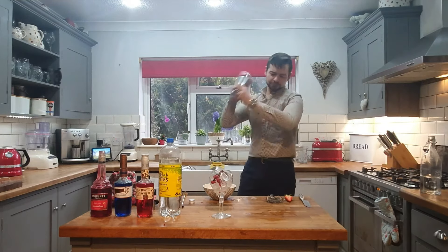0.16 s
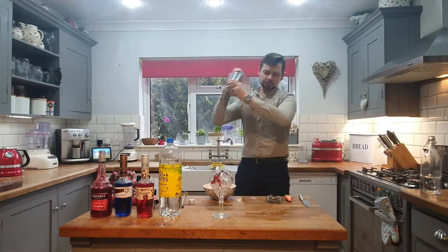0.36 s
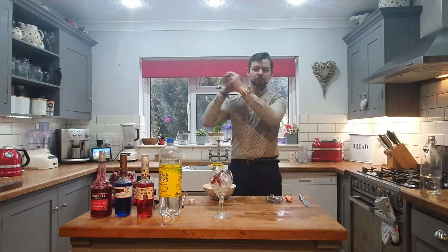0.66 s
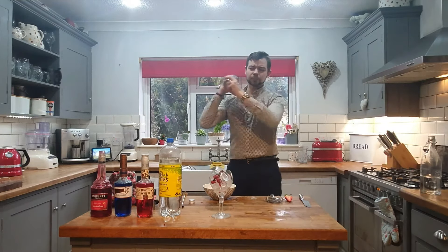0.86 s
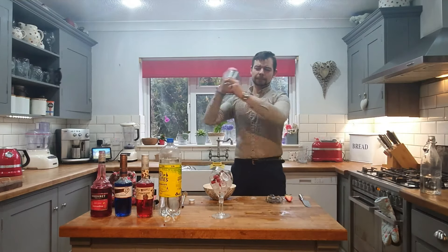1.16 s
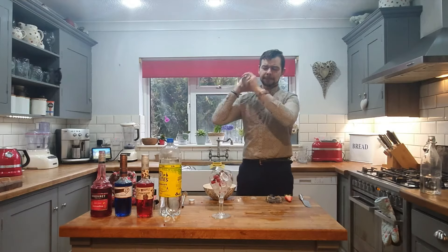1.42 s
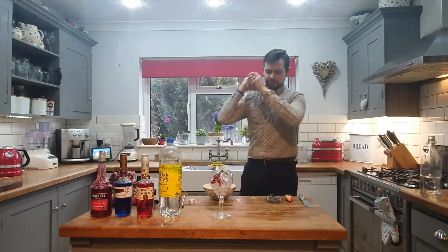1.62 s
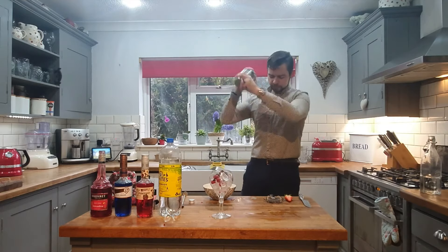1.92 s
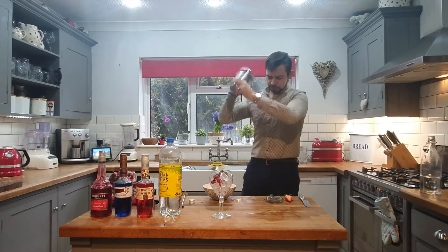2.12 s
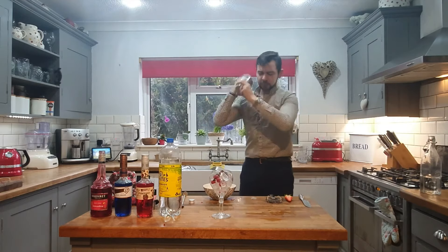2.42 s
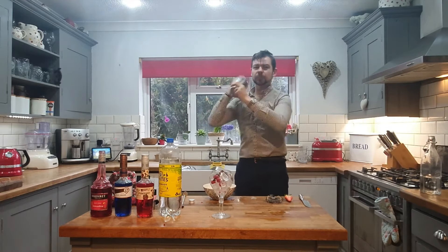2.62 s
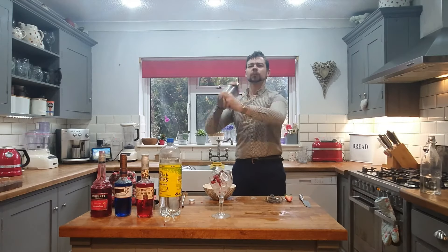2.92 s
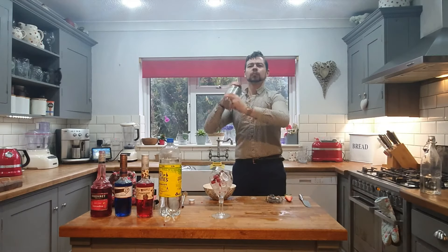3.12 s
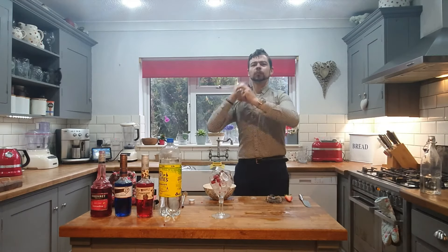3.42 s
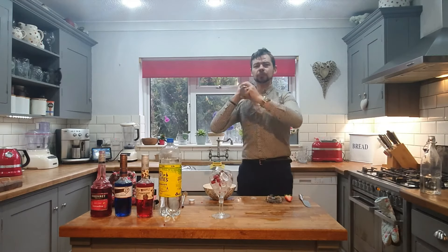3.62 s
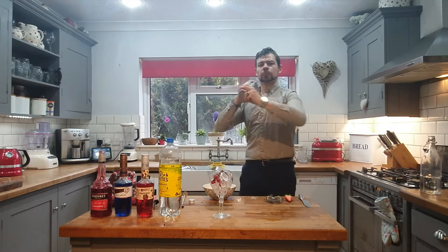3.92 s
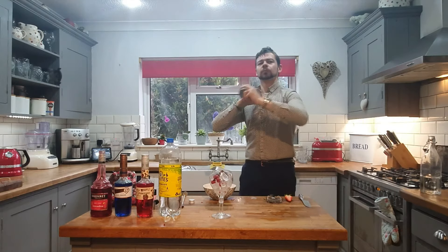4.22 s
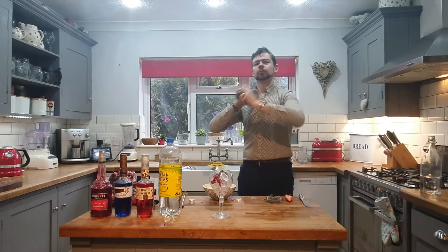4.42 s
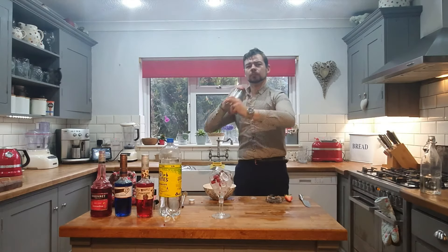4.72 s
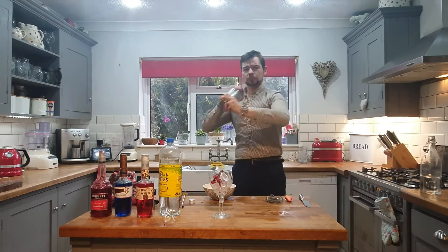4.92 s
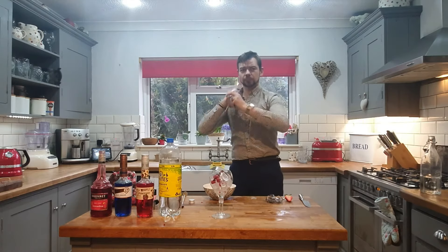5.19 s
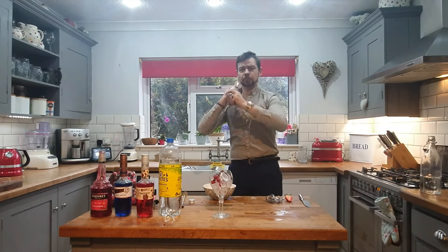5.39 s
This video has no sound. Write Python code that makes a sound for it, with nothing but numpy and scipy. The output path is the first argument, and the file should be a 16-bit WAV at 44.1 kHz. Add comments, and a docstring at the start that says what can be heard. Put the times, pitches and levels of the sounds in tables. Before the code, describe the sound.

A metal cocktail shaker full of ice is shaken hard at about five strokes a second, already in motion at the start and never stopping. Each stroke gives a dense rattling surge, then a lighter return, with dull metallic knocks and bright ticks. The shaker is a few metres from a stereo microphone pair in a hard, tiled kitchen, so reverberation blurs the hits over a very faint low rumble.

```python
"""Ice cubes are shaken hard in a steel cocktail shaker, a few metres from two microphones in a tiled kitchen.
At each end of a stroke the load surges against the wall: random clicks excite resonances of shell and ice.
Big cubes knock the hand-damped shell: short decaying sines, thuds and ticks, with a few bright cracks.
Most of what arrives is the kitchen's reverberation, made of decaying noise, over a faint rumble and hum."""
import sys
import numpy as np
from scipy import signal
from scipy.fft import rfft, irfft, next_fast_len
from scipy.io import wavfile
from scipy.ndimage import uniform_filter1d

SR = 44100
rng = np.random.default_rng(int(sys.argv[2]) if len(sys.argv) > 2 else 0)


def convert_level_to_amplitude(level_db):
    """Map a level in decibels to its linear amplitude factor."""
    exponent = np.asarray(level_db, float) / 20
    return 10 ** exponent


def to_wav(s):
    """Save 16-bit WAV."""
    ch = np.atleast_2d(s).T  # columns
    pcm = np.round(np.clip(ch, -1, 1) * 32767)  # PCM
    wavfile.write(sys.argv[1], SR, pcm.astype(np.int16))


N = 244755


def unit(x):
    """Scaled to rms 1."""
    return x / np.sqrt(np.mean(x ** 2) + 1e-20)


def along(points, hz):
    """Interpolates (Hz, value) points on a log-frequency axis."""
    f, v = np.transpose(points)
    return np.interp(np.log(hz + 1), np.log(f + 1), v)


def curve(rows):
    """Interpolates (seconds, value) rows to one value per sample."""
    return np.interp(np.arange(N) / SR, *np.transpose(rows))


def filtered(x, response):
    """x times a complex response of frequency."""
    m = next_fast_len(N + 8192)
    spectrum = rfft(x, m) * response(np.fft.rfftfreq(m, 1 / SR))
    return irfft(spectrum, m)[..., :N]


def resonant(x, modes):
    """x through parallel two-pole resonances of alternating sign; modes: (Hz, width Hz, dB)."""
    def response(f):
        total = 0
        for k, (centre_hz, width_hz, db) in enumerate(modes):
            damping = 1j * f * width_hz
            total = total + (-1) ** k * convert_level_to_amplitude(db) * damping / (centre_hz ** 2 - f ** 2 + damping)
        return total
    return filtered(x, response)


def contacts(per_second, spread_db):
    """Small contacts: clicks at random times, of scattered strength and random sign."""
    size = convert_level_to_amplitude(spread_db * np.clip(rng.standard_normal(N), -2, 2))
    return (rng.random(N) < per_second / SR) * size * rng.choice([-1, 1], N)


def damped(db, hz, t60_s, t):
    """A mode that starts within a few cycles and dies away."""
    onset = 1 - np.exp(-t / 0.00084)
    return convert_level_to_amplitude(db - 60 * t / t60_s) * onset * np.sin(2 * np.pi * hz * t)


# Left-right likeness of diffuse sound. Each row: frequency in Hz, correlation 0-1.
LIKENESS = [(100, 0.4), (400, 0.54), (700, 0.32), (1300, 0.05), (2300, 0)]


def paired(two):
    """Two unrelated signals mixed to the room's left-right likeness: correlation = cos(2 turn)."""
    def response(hz):
        turn = np.arccos(np.clip(along(LIKENESS, hz), 0, 1)) / 2
        return np.array([np.cos(turn), np.sin(turn)])
    mid, side = filtered(two, response)
    return np.array([mid + side, mid - side])


# Rumble course. Each row: time in seconds, level in dB.
RUMBLE_LEVEL = [(0, -51.5), (.6, -60.5), (.95, -52.5), (1.6, -56.5), (2.2, -52), (3.7, -56), (4.5, -57),
                (5.55, -54)]
# Hum course. Each row: time in seconds, level in dB.
HUM_LEVEL = [(0, -101), (1.8, -61), (2.1, -60), (3.1, -55.5), (3.5, -77), (5.55, -75)]
# Rumble spectrum. Each row: frequency in Hz, relative density in dB per Hz.
RUMBLE_SPECTRUM = [(15, -40), (30, -19), (65, -5), (140, -10), (250, -7.5), (400, -22.5), (800, -90)]


def background():
    """Low rumble noise, unevenly thinned as by a noise suppressor, and a sine hum."""
    z = signal.stft(rng.standard_normal((2, N)), nperseg=2048)[2]
    field = uniform_filter1d(rng.standard_normal(z.shape[1:]), 4, 0)
    field = uniform_filter1d(field, 3, 1)
    uneven_db = 5.1 * unit(field)
    noise = signal.istft(z * convert_level_to_amplitude(uneven_db), nperseg=2048)[1][:, :N]
    rumble = unit(filtered(paired(noise), lambda hz: convert_level_to_amplitude(along(RUMBLE_SPECTRUM, hz))))
    hum = np.sin(2 * np.pi * 61.3 * np.arange(N) / SR)
    return convert_level_to_amplitude(curve(RUMBLE_LEVEL)) * rumble + convert_level_to_amplitude(curve(HUM_LEVEL)) * hum


# Kitchen decay. Each row: frequency in Hz, t60 in seconds.
KITCHEN_T60 = [(300, 0.7), (1000, 0.6), (2000, 0.66), (4000, 1), (10000, 0.23)]


def room_tail():
    """One stereo impulse response: noise decaying by band, lumpy while the near walls answer singly."""
    hz, t, z = signal.stft(rng.standard_normal((2, 18000)), SR, nperseg=256)
    decay = convert_level_to_amplitude(-60 * t / along(KITCHEN_T60, hz)[:, None])
    tail = signal.istft(z * decay, SR, nperseg=256)[1]
    age = np.arange(tail.shape[1]) / SR
    lumps = np.interp(age * 400, np.arange(200), rng.standard_normal(200))
    early_db = (3 + 6.0 * lumps) * np.exp(-age / 0.037)
    tail = tail * convert_level_to_amplitude(early_db) * (1 - np.exp(-age / 0.0015))
    return tail / np.linalg.norm(tail[0])


def kitchen(x, size=2048):
    """Each short overlapping stretch gets a freshly drawn noise tail, which keeps the reverberation smooth."""
    out = np.zeros((2, N + size * 3 + SR))
    fade = np.hanning(size * 2 + 1)[:-1]
    x = np.pad(x, (size, size * 2))
    for at in range(0, N + size, size):
        stretch = x[at:at + size * 2] * fade
        wet = signal.fftconvolve(stretch[None], room_tail(), axes=1)
        out[:, at:at + wet.shape[1]] += wet
    return paired(out[:, size:size + N])


# Shakes, read by surges() and lesser_knocks(). Each row: start in seconds, then relative levels in dB
# of the clatter, fizz and shell ring at the far end, and of the clatter of the return.
SHAKE_ROWS = [(-.16, -26.5, -33, -22, -18), (.038, -24.5, -26, -23.5, -24.5), (.247, -25, -30, -18, -24),
              (0.459, -21, -30, -20.5, -27.5), (.681, -23.5, -32, -18.5, -27.5),
              (0.867, -24, -33, -21, -27.5), (1.079, -26, -32.5, -21.5, -27),
              (1.263, -25.5, -31, -17.5, -31), (1.469, -27.5, -36, -16, -28),
              (1.66, -25.5, -32, -20.5, -27.5), (1.883, -25.5, -34, -19.5, -27),
              (2.071, -23.5, -33, -20.5, -24.5), (2.299, -27, -37, -23, -28.5), (2.494, -26, -36, -24, -26),
              (2.671, -24, -32, -25, -24), (2.89, -25.5, -32.5, -24.5, -28),
              (3.094, -27.5, -33, -26.5, -27.5), (3.279, -23.5, -29, -20, -26.5),
              (3.5, -27.5, -35, -35, -27), (3.667, -29, -37, -42, -31.5), (3.841, -27, -46, -19.5, -29.5),
              (4.049, -27.5, -42, -31, -28.5), (4.22, -27.5, -32.5, -26, -26.5),
              (4.44, -28.5, -37, -28, -30.5), (4.624, -25.5, -36, -24.5, -31.5),
              (4.845, -29, -35.5, -32, -31), (5.03, -24.5, -35.5, -25, -28.5),
              (5.259, -25.5, -33.5, -30, -30), (5.43, -22, -35, -22, -33)]


def surges():
    """Clatter, fizz and ring envelopes: the load hits the far end, then falls back; each surge swells and fades."""
    t, power = np.arange(N) / SR, np.zeros((3, N))
    start = np.transpose(SHAKE_ROWS)[0]
    cycles_s = np.diff(start, append=2 * start[-1] - start[-2])
    for (start_s, *far_db, back_clatter_db), cycle_s in zip(SHAKE_ROWS, cycles_s):
        back_db = back_clatter_db + np.array([0, -9, 1.4])  # clatter, fizz, ring
        far = (start_s, 0.019, far_db)
        back = (start_s + 0.45 * cycle_s, 0.029, back_db)
        for at_s, swell_s, level_db in (far, back):
            u = np.clip(t - at_s, 0, None) / swell_s
            power += np.outer(convert_level_to_amplitude(level_db) ** 2, u * np.exp(1 - u))
    return np.sqrt(power)


# Resonances excited by small contacts, in four groups.
# Each row: frequency in Hz, width in Hz, relative level in dB. The shell's are passed twice, so figures are per pass.
SHELL_MODES = [(1858, 460, 4.5), (1300, 250, -6)]
CLATTER_MODES = [(2920, 1000, 6.5), (3405, 670, 5), (4200, 840, 1.5), (5680, 1200, -3)]
FIZZ_MODES = [(8500, 2600, -8), (11430, 4000, -4)]
SLOSH_MODES = [(333, 17, -1.5), (405, 34.3, -1), (756, 560, -7.5)]


def rattle():
    """Showers of contacts ring the shell, clatter, fizz and slosh under the surge envelopes."""
    clatter, fizz, ring = surges()
    clinks = sum(resonant(contacts(500, spread_db=6.5), [mode]) for mode in CLATTER_MODES)  # one mode per clink
    hiss = resonant(contacts(2700, spread_db=6.5), FIZZ_MODES)
    shell = resonant(resonant(contacts(900, spread_db=4.5), SHELL_MODES), SHELL_MODES)
    slosh = resonant(contacts(800, spread_db=6.5), SLOSH_MODES)
    return (convert_level_to_amplitude(0.5) * clatter * unit(clinks)
            + convert_level_to_amplitude(-3) * fizz * unit(hiss)
            + convert_level_to_amplitude(-2.0) * ring * unit(shell)
            + convert_level_to_amplitude(-12.5) * clatter * unit(slosh))


# Bare ice on steel. Each row: time in seconds, relative level in dB.
CRACK_ROWS = [(.042, -7), (2.509, -12), (2.906, -13.5), (3.293, -15), (3.841, -13.5), (4.047, -18)]


def cracks():
    """Bare ice on steel: a treble noise burst a few milliseconds long."""
    out, t = np.zeros(N), np.arange(600) / SR
    for s, db in CRACK_ROWS:
        out[round(s * SR):][:len(t)] += convert_level_to_amplitude(db - 60 * t / 0.018) * rng.standard_normal(len(t))
    return resonant(out, [(6000, 3000, 0)])


# Chance knocks. Rows: relative level in dB, shell pitch in Hz, thud in relative dB. Each row: mean, spread.
LESSER_SPREAD = [(-15.5, 1.17), (1816, 180), (-21, 4.5)]


def lesser_knocks(count=36):
    """Rows like the loud knocks, 10 to 75 % of the way through a random shake, before the next landing."""
    mean, spread = np.transpose(LESSER_SPREAD)
    start, draw = np.transpose(SHAKE_ROWS)[0], rng.random((count, 2))
    shake = 1 + (draw[:, 0] * (len(start) - 2)).astype(int)
    when = start[shake] + np.diff(start)[shake] * (.1 + .65 * draw[:, 1])
    strikes = mean + spread * rng.standard_normal((count, len(mean)))
    return np.column_stack([when, strikes]).tolist()


# Big cubes. Each row: time in seconds, relative level in dB, shell pitch in Hz, thud in dB relative to that level.
LOUD_KNOCKS = [(0.042, -5.5, 1900, -14), (0.258, -2, 1966, -15.5), (0.354, -17, 1720, -22),
               (0.466, -2.5, 1804, -13), (0.681, -2.5, 1880, -21), (0.711, -7, 2030, -16),
               (0.742, -14.5, 1980, -14), (0.866, -7.5, 1760, -20), (0.879, -0.5, 1850, -22),
               (0.923, -8, 2010, -23), (1.092, -8.5, 1570, -6), (1.278, -6, 1730, -22.5),
               (1.291, -8, 1920, -16.5), (1.473, -1, 1744, -14.5), (1.637, -10, 1870, -37),
               (1.669, -7.5, 1810, -21), (1.692, -5.5, 1980, -11.5), (1.895, -9, 2050, -12),
               (2.091, -4, 1746, -19.5), (2.301, -11, 1560, -8), (2.409, -18, 1720, -14),
               (2.51, -5.5, 1710, -14), (2.63, -7, 1890, -39), (2.67, -11.5, 1850, -25),
               (2.696, -12, 1670, -6.5), (2.738, -10, 1930, -26), (2.907, -12.5, 1940, -9.5),
               (2.935, -9, 2080, -39), (3.097, -11, 1900, -5), (3.213, -11, 1820, -29),
               (3.293, -7, 1780, -10.5), (3.486, -4.5, 1800, -19.5), (3.51, -8, 2170, -15.5),
               (3.674, -4.5, 1580, -13.5), (3.843, 0, 1636, -29.5), (3.885, -11, 1750, -26),
               (4.047, -2, 1650, -21.5), (4.167, -12, 1870, -39), (4.227, 0, 1595, -19.5),
               (4.395, -10.5, 1830, -35), (4.414, -7.5, 1746, -27), (4.437, -19.5, 1500, -5),
               (4.853, -9, 1820, -9.5), (5.036, -21, 1900, -5), (5.254, -22, 1420, -2.5),
               (5.434, 1, 1610, -17.5)]
# Clanks: short high rings of the upper shell modes, some together with a knock.
# Each row: time in seconds, relative level in dB.
CLANK_ROWS = [(.466, -23), (1.276, -17), (1.309, -13), (1.473, -14), (1.495, -11.5), (1.531, -15.5),
              (1.669, -25), (3.486, -19), (5.456, -20)]
# Upper shell modes. One row: mean frequency in Hz, spread in Hz, t60 in seconds.
UPPER_MODES = (2880, 130, 0.028)
# Body of a blow. Each row: frequency in Hz, width in Hz, relative level in dB.
THUD_MODES = [(1363, 520, 3), (960, 490, -16), (2245, 160, -1)]
# Hard edge of a blow. Each row: frequency in Hz, width in Hz, relative level in dB.
TICK_MODES = [(6520, 370, -1), (10000, 1900, -14)]


def knocks():
    """A cube strikes: the shell rings briefly at a pitch set by grip and load; the cubes behind it pile on."""
    ring, thuds, ticks = np.zeros(N + SR), np.zeros(N + SR), np.zeros(N)
    t = np.arange(2600) / SR
    for s, db, hz, thud_db in LOUD_KNOCKS + lesser_knocks():
        at = round(s * SR)
        ring[at:][:len(t)] += damped(db + 5.0, hz, 0.016, t)
        hits = rng.random(len(t)) < 700 / SR
        pile = hits * rng.standard_normal(len(t)) * convert_level_to_amplitude(-60 * t / 0.13)
        pile[0] = 1  # the first cube
        thuds[at:][:len(t)] += convert_level_to_amplitude(db + thud_db + 32) * pile
        ticks[at] = convert_level_to_amplitude(db + 9.0)
    mean_hz, spread_hz, t60_s = UPPER_MODES
    for s, db in CLANK_ROWS:
        for hz in rng.normal(mean_hz, spread_hz, size=2):
            ring[round(s * SR):][:len(t)] += damped(db, hz, t60_s, t)
    dull = lambda hz: 1 / (1 + 1j * hz / 3000) ** 2
    thud = filtered(resonant(thuds[:N], THUD_MODES), dull)
    return ring[:N] + thud + resonant(ticks, TICK_MODES)


def scene():
    """Knocks and rattle both come mostly by way of the walls; knocks keep a stronger direct part.

    So small a vessel sends out little bass."""
    small = lambda hz: (1j * hz / (1j * hz + 330)) ** 2
    shower = filtered(rattle(), small)
    blows = filtered(knocks() + cracks(), small)
    direct = convert_level_to_amplitude(-7.5) * shower + convert_level_to_amplitude(-4.5) * blows
    reverberant = convert_level_to_amplitude(0.5) * kitchen(shower + convert_level_to_amplitude(-0.52) * blows)
    return direct + reverberant + background()


# Microphone balance. Each row: frequency in Hz, left over right in dB.
MIC_BALANCE = [(60, 8), (200, 6.5), (400, .5), (800, 0), (1300, -3.5), (1900, -5), (2700, -1.5),
               (5000, 0.5), (9000, -3.5), (14000, -1)]


def microphones(dry):
    """The two microphones differ in colour; the left one hears 20 microseconds later."""
    def response(hz):
        colour = convert_level_to_amplitude(np.outer([.5, -.5], along(MIC_BALANCE, hz)))
        return colour * np.exp(np.outer([-1j, 1j], np.pi * hz * .00002))
    return filtered(dry, response)


def hushed(x, noise_db=-72, edge_hz=300, floor_db=-20):
    """Noise suppressor: weak bass bins are turned down, the more the nearer they come to a fixed noise curve."""
    hz, _, z = signal.stft(x, SR, nperseg=2048)
    power = uniform_filter1d(np.mean(np.abs(z) ** 2, axis=0), size=3, axis=0) + 1e-20
    noise = convert_level_to_amplitude(noise_db) ** 2 / (1 + (hz[:, None] / edge_hz) ** 8)
    gain = np.maximum(1 - noise / power, convert_level_to_amplitude(floor_db))
    return signal.istft(z * gain, SR, nperseg=2048)[1][:, :N]


def top_cut(x):
    """Nothing passes above the cut-off."""
    return signal.sosfilt(signal.butter(12, 15010, fs=SR, output="sos"), x)


def record(dry):
    """Two microphones, bass hushed, peaks rounded smoothly below 0.97."""
    ports = hushed(microphones(dry))
    rounded = ports / (1 + np.abs(ports / .97) ** 6) ** (1 / 6)
    return top_cut(rounded)


dry = scene()
out = record(dry)
to_wav(out)
```